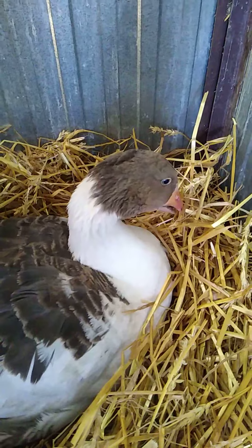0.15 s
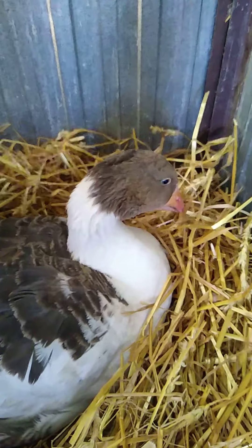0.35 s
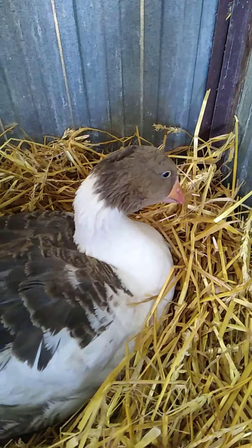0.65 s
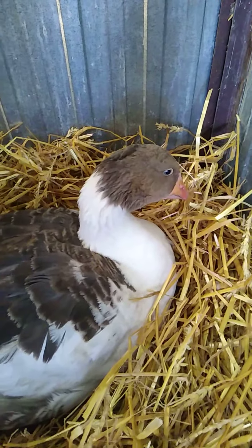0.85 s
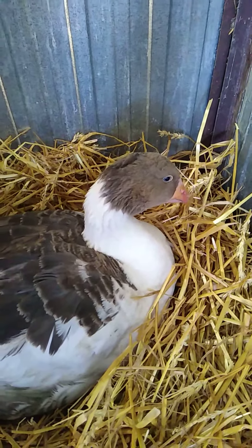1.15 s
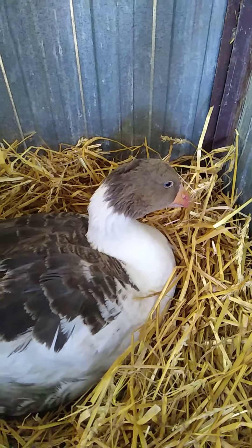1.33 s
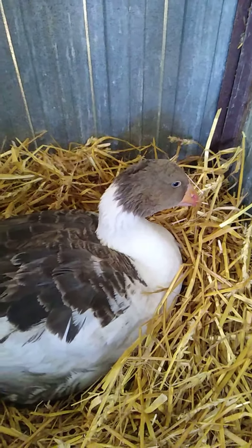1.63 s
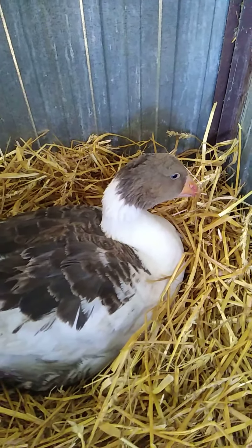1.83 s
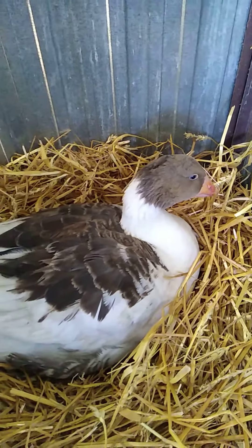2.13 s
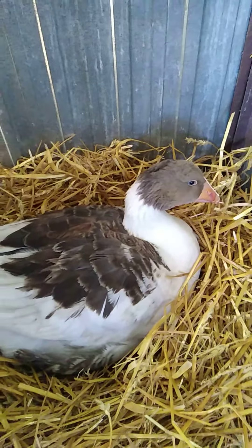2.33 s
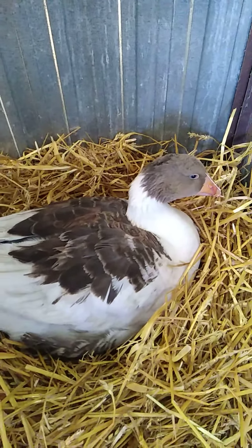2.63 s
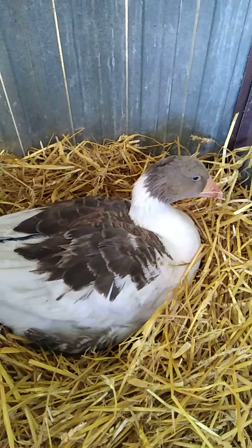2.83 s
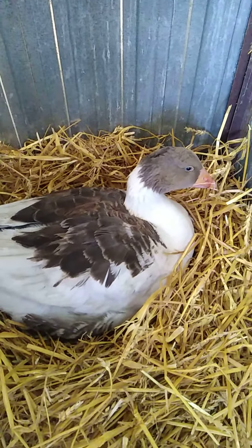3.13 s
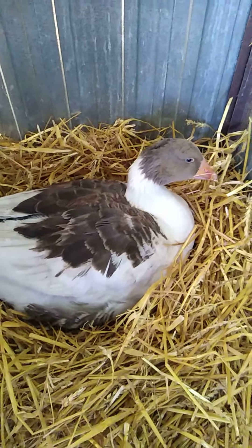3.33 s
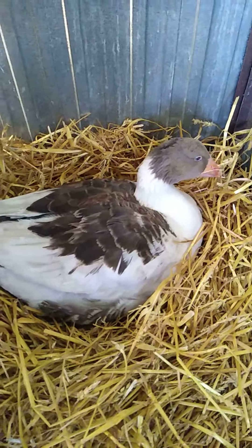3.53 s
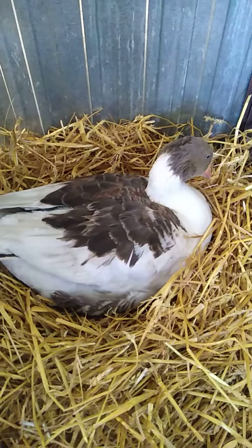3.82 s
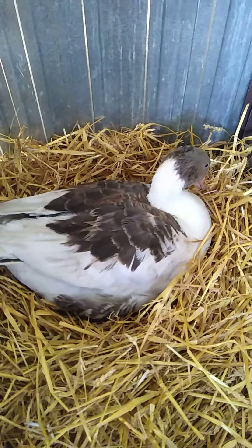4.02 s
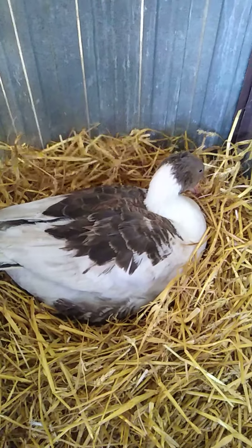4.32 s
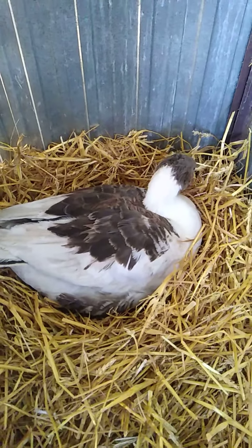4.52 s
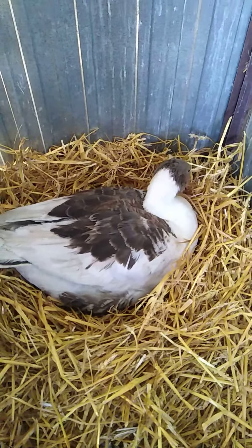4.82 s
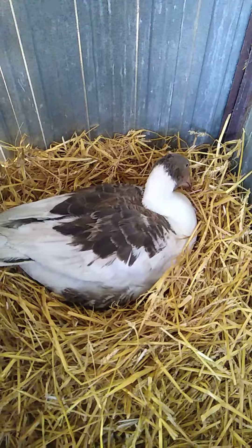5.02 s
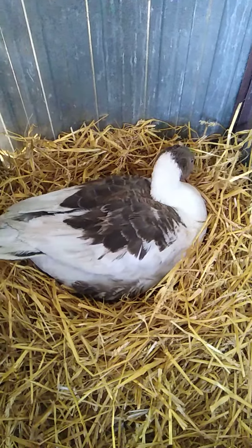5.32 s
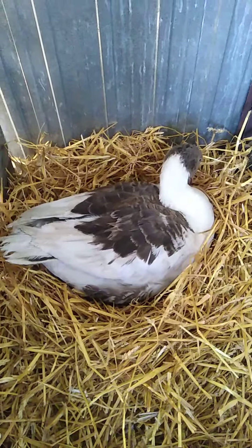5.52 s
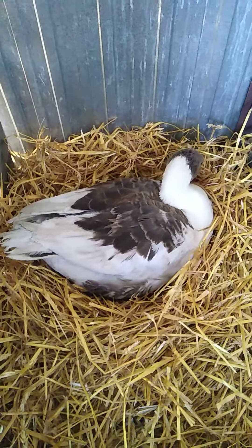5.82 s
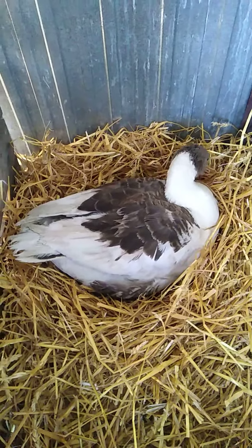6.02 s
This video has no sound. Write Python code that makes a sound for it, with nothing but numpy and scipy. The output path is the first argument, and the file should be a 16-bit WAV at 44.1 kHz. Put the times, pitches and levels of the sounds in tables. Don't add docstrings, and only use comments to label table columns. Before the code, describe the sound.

A goose close by ends a hoarse, growling honk, then straw rustles while distant fowl honk and cluck and two thin squeals rise near the end.

```python
import sys
import numpy as np
from scipy import signal
from scipy.fft import rfft, irfft
from scipy.io import wavfile
from scipy.ndimage import uniform_filter1d, minimum_filter1d

SR = 44100
rng = np.random.default_rng(int(sys.argv[2]) if len(sys.argv) > 2 else 0)


def to_wav(sig):
    pcm = np.clip(np.atleast_2d(sig), -1, 1) * 32767
    pcm = np.round(pcm).astype(np.int16)
    wavfile.write(sys.argv[1], SR, pcm.T)


def invert_db(level):
    return 10 ** (np.asarray(level, dtype=float) / 20)


N = 271634
T = np.arange(N) / SR


def evened(x):
    return x / np.sqrt(np.mean(x ** 2) + 1e-20)


def read(points, hz):
    f, value = np.transpose(points)
    return np.interp(np.log(hz + 1), np.log(f + 1), value)


def columns(rows, edge=0.0053):
    s, *rest = np.transpose(rows)
    opening = np.clip((T - s[0]) / edge + (s[0] <= 0), 0, 1)
    closing = np.clip((s[-1] - T) / edge + (s[-1] >= T[-1]), 0, 1)
    return [opening * closing] + [np.interp(T, s, c) for c in rest]


def drift(hz):
    lowpass = signal.butter(2, hz, fs=SR, output="sos")
    return evened(signal.sosfilt(lowpass, rng.standard_normal(N)))


def resonate(x, hz, width):
    turn = np.exp(2j * np.pi * np.cumsum(hz * np.ones(len(x))) / SR)
    r = np.exp(-np.pi * width / SR)
    return 2 * (turn * signal.lfilter([1 - r], [1, -r], x / turn)).real


def partials(hz, levels_db, jitter, flutter_db, flutter_hz):
    phase = 2 * np.pi * np.cumsum(hz * (1 + jitter * drift(187))) / SR
    rows = []
    for k, db in levels_db:
        rows.append(np.sqrt(2) * invert_db(db + flutter_db * drift(flutter_hz)) * np.exp(1j * k * phase))
    return np.array(rows)


# f/Hz, correlation
LIKENESS = [(60, 0.99), (180, 0.85), (550, 0.41), (1650, -0.61), (4970, 0.026), (15000, 0.13)]


def noise(spectrum, patchy_db, size=512):
    hop, hz = size // 4, np.fft.rfftfreq(size, 1 / SR)
    a, b, c, d, patches = rng.standard_normal((N // hop + 5, len(hz), 5)).T
    patches = uniform_filter1d(patches, size=5, axis=0)
    patches = evened(uniform_filter1d(patches, size=12, axis=1))
    same = np.clip(read(LIKENESS, hz), -1, 1)[:, None]
    left, own = a + 1j * b, c + 1j * d
    late = np.exp(-2j * np.pi * hz * 0.00023)[:, None]
    z = np.array([left, same * late * left + np.sqrt(1 - same ** 2) * own])
    inside = (hz >= spectrum[0][0]) & (hz <= spectrum[-1][0])
    colour_db = read(spectrum, hz) - 40 * ~inside
    z *= invert_db(colour_db[:, None] + patchy_db * patches)
    return evened(signal.istft(z, nperseg=size, noverlap=size - hop)[1][:, :N])


def space(x, decays, count):
    taps = np.zeros((2, SR // 2))
    at = np.arange(count, SR // 2 - 20, 20)
    at = at + rng.integers(0, 20, (2, len(at)))
    np.put_along_axis(taps, at, rng.choice([-1., 1.], at.shape), axis=1)
    hz, t, z = signal.stft(taps, SR, nperseg=256)
    decay = invert_db(-60 * t / read(decays, hz)[:, None])
    tail = signal.istft(z * decay, SR, nperseg=256)[1]
    return signal.fftconvolve(x[None], tail / np.linalg.norm(tail[0]), axes=1)[:, :N]


def placed(x, left_db, count):
    return np.array([np.roll(x, count) * invert_db(left_db / 2), x * invert_db(-left_db / 2)])


# t/s, level/dB
GUSTS = [(0.0, -54), (0.12, -58.5), (0.29, -54.5), (0.38, -73), (0.41, -67), (0.58, -73.5), (1.03, -65.5),
         (1.08, -70), (1.11, -61.5), (1.17, -70), (1.25, -66), (1.29, -70), (1.51, -62.5), (2.01, -70.5),
         (2.06, -64), (2.16, -70), (2.57, -65.5), (2.69, -56.5), (2.76, -65), (2.8, -56), (2.83, -55.5),
         (2.93, -68), (3.07, -55.5), (3.26, -68), (3.33, -54), (3.36, -54.5), (3.41, -68), (3.5, -70),
         (3.55, -56), (3.6, -50.5), (3.77, -68.5), (3.88, -62.5), (4.03, -64), (4.08, -70.5), (4.7, -65.5),
         (4.74, -70), (4.8, -63), (5.35, -70.5), (5.49, -60), (5.54, -72), (5.87, -68), (6.04, -61),
         (6.07, -70), (6.16, -81)]
# f/Hz, level/dB
WIND = [(15, -31), (25, -34.5), (51, 7.5), (75, 7), (166, -15.5), (202, -9.5), (237, -12), (400, -19.5),
        (520, -50), (880, -120)]
# t/s, level/dB
MURMUR = [(0.36, -67), (0.67, -71.5), (0.99, -75), (2.51, -72), (2.65, -64), (2.93, -66.5), (3.64, -61),
          (3.77, -57), (3.9, -68), (4.12, -66), (4.41, -66.5), (4.79, -75), (5.04, -72), (6.16, -64)]
# f/Hz, level/dB
FLOCK = [(120, -23), (200, -7.5), (329, -16.5), (452, -2.5), (567, -7.5), (728, -3.5), (853, -4),
         (1200, -8.5), (1300, -13.5), (3000, -26), (3900, -28), (6600, -120)]
# f/Hz, level/dB
HISS = [(15, -40), (25, 2.5), (59, -9), (86, -1), (199, -12.5), (555, -23), (635, -13.5), (878, -12),
        (1350, -42), (1970, -21.5), (6450, -33.5), (12000, -34.5), (15700, -48.5)]


def air():
    rumble = invert_db(columns(GUSTS)[1]) * noise(WIND, patchy_db=1.5, size=1024)
    murmur = invert_db(columns(MURMUR)[1]) * noise(FLOCK, patchy_db=5, size=1024)
    return rumble + murmur + invert_db(-72) * noise(HISS, patchy_db=2.3, size=1024)


# t/s, level/dB, extra level of the dull part/dB
STROKES = [(0.0, -68, 18), (0.01, -72.5, 18), (0.24, -68, 17), (0.29, -75.5, 20), (0.31, -63.5, 9.5),
           (0.38, -85, 15), (0.7, -86.5, 7), (0.75, -71.5, 2), (0.84, -87.5, 12), (1.15, -74.5, -0.5),
           (1.23, -82.5, 3), (1.47, -70, 4), (1.99, -86, 3), (2.04, -72, 9), (2.07, -83, 8.5),
           (2.4, -82, 2.5), (2.81, -66.5, 6.5), (2.83, -62, 7), (2.88, -80, 8.5), (3.14, -66.5, 5),
           (3.23, -84, 11), (3.31, -67.5, 7), (3.46, -82.5, 4.5), (3.6, -66.5, 7), (3.74, -77, 11),
           (4.0, -75, 14), (4.32, -85, 2), (4.68, -68, -3.5), (4.72, -72.5, 5.5), (4.75, -60, -5),
           (4.8, -65.5, -1.5), (4.85, -60, -6.5), (4.87, -69.5, 2.5), (4.91, -55.5, -8.5),
           (4.92, -65.5, 4.5), (5.03, -76.5, -2), (5.13, -68.5, -18), (5.16, -76.5, -8), (5.25, -67, 5.5),
           (5.32, -56, -3), (5.37, -59, -3), (5.44, -54, 2), (5.54, -72.5, -7.5), (5.73, -79, -24),
           (5.81, -65, -0.5), (6.0, -53, -3), (6.11, -79.5, -39), (6.16, -63, -8)]
# t/s, peak level/dB
SNAPS = [(0.3084, -41.5), (0.3916, -64), (0.5672, -63), (0.7338, -72), (0.9528, -57), (1.8255, -58),
         (2.0374, -66.5), (2.198, -58), (2.7857, -75), (2.8181, -67), (2.9548, -51), (3.1309, -65.5),
         (3.2541, -62), (3.302, -70), (3.508, -55), (3.555, -53), (3.5983, -65), (3.6831, -53),
         (3.885, -50.5), (4.0019, -51), (4.5087, -55), (4.55, -52), (4.6045, -68), (4.6384, -67),
         (4.7322, -71), (4.7612, -57), (4.8425, -53), (4.8856, -47), (4.949, -47), (4.9892, -59),
         (5.0246, -58), (5.0979, -53), (5.2171, -67), (5.2461, -54), (5.277, -40), (5.3069, -31.5),
         (5.3718, -53), (5.405, -40), (5.43, -44), (5.787, -51), (5.82, -44), (5.8552, -42), (5.9889, -35),
         (6.1155, -55)]
# f/Hz, level/dB
STRAW = [(880, -43), (1500, -36), (1940, -19), (2840, -17), (3850, -11), (6880, -8), (8290, -10),
         (12500, -2), (15700, -4.5)]
# f/Hz, level/dB
DULL = [(120, -28.5), (200, 4), (403, -10.5), (923, -0.5), (1020, -12.5), (1770, -9.5), (4680, -17.5),
        (9000, -35.5), (11700, -42), (19800, -120)]


def rustle():
    gate, level_db, dull_db = columns(STROKES)
    grains = invert_db(3.9 * np.minimum(rng.exponential(1, N), 3)) * (rng.random(N) < 60 / SR)
    grain_power = signal.oaconvolve(grains ** 2, invert_db(-120 * T[:900] / 0.059))[:N]
    flicker = invert_db(1.6 * drift(70)) * np.sqrt(1 + 0.32 * grain_power)
    snap_power = np.zeros(N)
    for s, db in SNAPS:
        after = np.maximum(T - s, 0)
        crack, settling = invert_db(-120 * after / 0.01), 0.2 * invert_db(-120 * after / 0.15)
        snap_power += (T >= s) * invert_db(2 * (db - 7)) * (crack + settling)
    bright_level = np.sqrt((invert_db(level_db + 0.73) * flicker) ** 2 + snap_power)
    bright = bright_level * noise(STRAW, patchy_db=3.1, size=256)
    return bright + invert_db(level_db + dull_db - 3) * flicker * noise(DULL, patchy_db=1.5)


# t/s, f/Hz, level of partials 1, 2, 3/dB
HONKS = [
    [(0.33, 529.4, -56, -67, -72), (0.36, 542.7, -68, -69, -69), (0.452, 509, -72.5, -64, -74),
     (0.584, 520, -84, -79.5, -87), (0.824, 502, -85, -83, -91), (0.92, 544, -84, -86, -77)],
    [(2.64, 463, -74, -70, -94), (2.76, 461.4, -65.5, -63, -91), (2.9, 463.4, -79, -91, -92)],
    [(3.64, 595.0, -36.5, -81, -82), (3.68, 596.9, -72.5, -102, -84), (3.864, 612, -64.5, -62, -65),
     (3.98, 574, -81, -78, -86)],
    [(3.68, 721, -78, -95, -93), (3.826, 749.3, -63, -76, -75), (4.06, 746.8, -75.5, -72, -81),
     (4.12, 775, -65, -91, -88)],
    [(3.66, 479.6, -70, -73, -90), (3.788, 447.9, -76, -67, -85), (3.892, 493, -74, -79, -81),
     (4.014, 481.6, -71.5, -68, -90), (4.3, 479, -85, -92, -86.5)],
    [(3.52, 992, -69, -98, -90), (3.556, 987, -72, -83, -99), (3.876, 1029, -73, -70.5, -78),
     (4.0, 1029, -55.5, -97, -85)],
    [(3.82, 542.6, -68, -69, -104), (3.884, 529, -82, -68, -71), (3.95, 535, -65, -58, -65.5),
     (4.2, 531, -96, -91, -86.5)],
    [(.14, 1637, -95, -65.5, -99), (.31, 1620, -95, -76, -99), (.6, 1630, -89, -100, -99)],
]
# multiple, level against the third/dB
HONK_UPPER = [
    [(4, -6.5), (5, -14)],
    [(4, 3)],
    [(5, -17)],
    [(4, -12)],
    [(4, 7.5)],
    [],
    [(4, -10), (5, -2), (7, -19), (9, -14), (11, -16)],
    [],
]


def honks():
    out = np.zeros(N)
    for rows, upper in zip(HONKS, HONK_UPPER):
        gate, hz, *db = columns(rows, edge=0.043)
        levels = [*enumerate(db, 1)] + [(k, db[2] + under_db) for k, under_db in upper]
        tones = partials(hz, levels, jitter=.016, flutter_db=3, flutter_hz=25)
        out += gate * tones.real.sum(axis=0)
    return out


# t/s, f/Hz, level/dB, length/s
CLUCKS = [(0.607, 620, -58, 0.026), (0.887, 615.5, -63.5, 0.029), (1.149, 590, -67.5, 0.027),
          (1.16, 948, -74.5, 0.046), (1.36, 838, -67.5, 0.051), (1.51, 430, -74.5, 0.035),
          (1.499, 926, -76, 0.048), (1.621, 768, -72.5, 0.061), (1.783, 459, -68.5, 0.022),
          (1.833, 740, -70.5, 0.028), (2.074, 409, -65, 0.047), (2.05, 854, -68, 0.048),
          (2.2, 847, -68, 0.023), (2.248, 691, -73, 0.049), (2.461, 878, -66, 0.041),
          (2.596, 620, -73, 0.023), (3.14, 546, -65.5, 0.024), (3.2, 852, -69.5, 0.076),
          (3.377, 576, -65, 0.028), (3.423, 891, -72, .08), (4.392, 2080, -68, 0.011),
          (4.396, 3540, -76.5, 0.033), (4.435, 473, -65.5, 0.018), (4.58, 476, -64.5, 0.044),
          (4.736, 427, -65, 0.055), (4.74, 850, -71, 0.05), (4.896, 420, -65.5, 0.056),
          (5.432, 886, -63.5, 0.067), (5.642, 880, -71, 0.059), (6.08, 880, -72, .07)]


def clucks():
    out = np.zeros(N)
    for s, hz, db, length in CLUCKS:
        t = np.arange(0, length, 1 / SR)
        swell = np.sin(np.pi * t / length) ** 0.27
        phase = 2 * np.pi * hz * t + 1.01 * np.sin(2 * np.pi * 25 * t)
        hoot = invert_db(db + 4.5) * swell * np.sin(phase)
        start = round(s * SR)
        out[start:][:len(t)] += hoot[:N - start]
    return out + 0.61 * np.roll(out, round(0.035 * SR))


# t/s, f/Hz, level/dB, octave level/dB
CHIRP = [
    (3.02, 4350, -71, -95),
    (3.045, 4500, -72, -78),
    (3.058, 4820, -65.5, -80),
    (3.09, 4770, -69, -74),
    (3.12, 4570, -63, -95),
    (3.145, 4560, -84, -99),
    (3.18, 4510, -85, -99),
]


def sparrow():
    gate, hz, *db = columns(CHIRP)
    tones = partials(hz, enumerate(db, 1), jitter=0.021, flutter_db=5.0, flutter_hz=80)
    return gate * tones.real.sum(axis=0)


# t/s, f/Hz, level of partials 1 to 4/dB
SQUEALS = [
    [(5.24, 1150, -72, -78, -72, -73), (5.268, 1480, -71, -71, -64.5, -75), (5.298, 1642, -59, -72, -64, -82), (5.315, 1734, -53, -57, -60.5, -86), (5.34, 1785, -56, -62, -54, -80)] + [(5.36, 1784, -56, -63, -55, -88), (5.41, 1850, -44.5, -49.5, -53, -89), (5.47, 1868, -61.5, -65.5, -73, -83), (5.52, 1832, -71, -80, -106, -94)],
    [(5.785, 1061, -75, -83, -82, -70), (5.82, 1400, -72, -59, -58.5, -62.5), (5.855, 1700, -61, -57.5, -56.5, -54.5), (5.88, 1723, -59.5, -57, -51, -57)] + [(5.905, 1793, -61, -69, -53, -60), (5.931, 1807, -58.5, -49.5, -40, -67), (5.973, 1875, -50, -50.5, -60, -84), (6.1, 1832, -89, -82, -105, -112)],
]
SQUEAL_LEAN = [-7.5, 7, 5, 8, -5, 0]


def squeals():
    out = np.zeros((2, N))
    lean = invert_db(np.array(SQUEAL_LEAN) / 2)[:, None]
    for rows in SQUEALS:
        gate, hz, *db = columns(rows)
        climb = np.clip(uniform_filter1d(np.gradient(hz) * SR, size=800) / 9000, 0, 1)
        fuzzy_hz = hz * (1 + 0.052 * climb * drift(377))
        levels = [*enumerate(db, 1), (5, db[3] - 35), (6, db[2] - 19)]
        tones = partials(fuzzy_hz, levels, jitter=0.0031, flutter_db=1.5, flutter_hz=70.5)
        for side, weight in enumerate([lean, 1 / lean]):
            scatter = np.array([invert_db(1.8 * drift(43)) * np.exp(.9j * drift(13.6)) for _ in levels])
            out[side] += gate * (weight * scatter * tones).real.sum(axis=0)
    return out


# t/s, f/Hz, level/dB, octave level/dB, hoarse noise level/dB
CALL = [
    (0, 537, -43, -56, -47),
    (.022, 538.2, -39.5, -44.5, -52.5),
    (.06, 549.2, -44, -53.5, -49),
    (.11, 568, -42.5, -51, -48),
    (.178, 566.6, -42, -44.5, -45),
    (.232, 547.7, -38, -43, -45),
    (.268, 508, -40.5, -56, -44.5),
    (.29, 469, -53, -70, -48),
    (.31, 440, -58, -81, -64),
    (.34, 436, -70, -80, -70),
]
# t/s, f/Hz, level/dB
GROWL = [(0, 197.5, -42), (.035, 192.3, -52), (.065, 196.8, -43.5), (.115, 184, -59), (.14, 182.8, -43),
         (.19, 194.4, -45), (.22, 183.6, -40.5), (.265, 164.3, -41), (.285, 141.5, -43.5), (.31, 135, -55),
         (.335, 155, -57), (.36, 150, -74)]
# multiple, level against the octave/dB
OVERTONES = [(3, -11), (4, -12.5), (5, -20.5), (6, -29), (9, -19), (10, -25), (11, -26)]
# f/Hz, width/Hz, level/dB
THROAT = [(620, 255, 1.5), (880, 250, -5), (1150, 180, -1), (1850, 200, -7.5), (2350, 260, -15.5),
          (3170, 500, -31), (5200, 500, -21.5)]


def goose():
    gate, hz, first_db, octave_db, hoarse_db = columns(CALL)
    low_gate, low_hz, low_db = columns(GROWL)
    turns = np.cumsum(low_hz * (1 + .1 * drift(60))) / SR
    shake = np.sin(2 * np.pi * turns)
    low = np.sqrt(2) * invert_db(low_db + 2.8 * drift(32)) * shake
    levels = [(1, first_db), (2, octave_db)] + [(k, octave_db + db) for k, db in OVERTONES]
    upper = partials(hz, levels, jitter=0.0027, flutter_db=1.2, flutter_hz=41.3).real
    upper = upper[0] + upper[1:].sum(axis=0) * (1 + 0.36 * shake)
    puffs = (0.47 + np.exp(-(turns % 1) / 0.51)) * rng.standard_normal(N)
    hoarse = np.zeros(N)
    for k, (f, width, db) in enumerate(THROAT):
        formant = resonate(resonate(puffs, f, width), f, width)
        hoarse += (-1) ** k * invert_db(db) * evened(formant)
    return gate * (upper + invert_db(hoarse_db + 3.0) * evened(hoarse)) + low_gate * low


# f/Hz, t60/s
YARD = [(300, 0.32), (1000, 0.32), (5000, 0.25)]
# f/Hz, t60/s
SHED = [(200, 0.1), (1000, 0.36), (6000, 0.088)]
# f/Hz, t60/s
TIN = [(1000, .13), (8000, .09)]


def scene():
    call, squeal, far, hoots, chirp = goose(), squeals(), honks(), clucks(), sparrow()
    near = placed(call, left_db=0.5, count=-5) + invert_db(-11.5) * space(call, SHED, count=200)
    near += squeal + invert_db(-7) * space(squeal[0], TIN, count=300)
    near += placed(chirp, left_db=1.5, count=-1) + invert_db(-7) * space(chirp, TIN, count=200)
    away = placed(far + hoots, left_db=2.5, count=-4)
    away += invert_db(-0.5) * space(far, YARD, count=400) + invert_db(-6.5) * space(hoots, YARD, count=400)
    return near + away + rustle() + air()


# f/Hz, left over right level/dB
PORTS = [(60, 5.5), (150, 1), (380, 4), (950, 0.5), (2380, 1), (5980, 3.5), (15000, 4)]


def microphones(mix):
    hz = np.fft.rfftfreq(N, 1 / SR)
    lean_db = read(PORTS, hz) / 2
    bass = 1 / np.sqrt(1 + (50 / (hz + 1)) ** 8)
    return irfft(rfft(mix) * bass * invert_db(np.array([lean_db, -lean_db])), N)


def masked(x, low_db, high_db):
    frame = dict(nperseg=2048, noverlap=1024, window="cosine")
    hz, t, z = signal.stft(x, SR, **frame)
    bands = z[:, :1024].reshape(2, 64, 16, -1)
    peak_db = 20 * np.log10(abs(bands).max(axis=2) + 1e-9)
    near_db = -minimum_filter1d(-peak_db, size=4, axis=1)
    limits_db = [99, low_db, low_db - 6, high_db, 99]
    under_db = np.interp(np.arange(64), [0, 6, 12, 24, 30], limits_db)[:, None]
    heard = (peak_db > near_db - under_db)[:, :, None]
    z = np.concatenate([(bands * heard).reshape(2, 1024, -1), z[:, 1024:]], axis=1)
    return signal.istft(z, SR, **frame)[1][:, :N]


def top_cut(x):
    return signal.sosfilt(signal.butter(12, 15850, fs=SR, output="sos"), x)


def record(dry):
    mix = masked(microphones(dry), low_db=23, high_db=11)
    return top_cut(mix)


dry = scene()
out = record(dry)
to_wav(out)
```